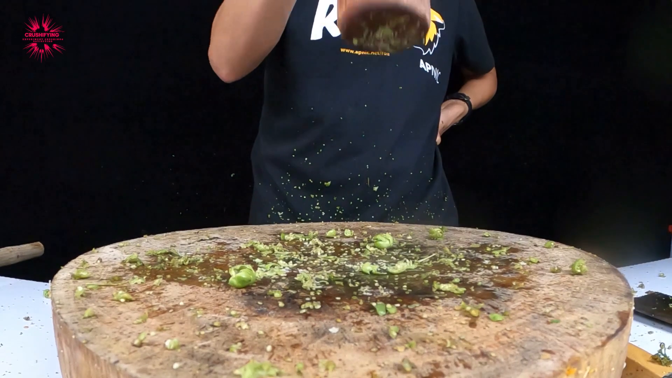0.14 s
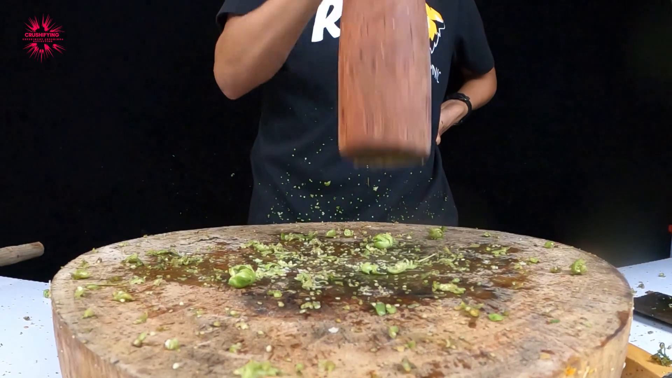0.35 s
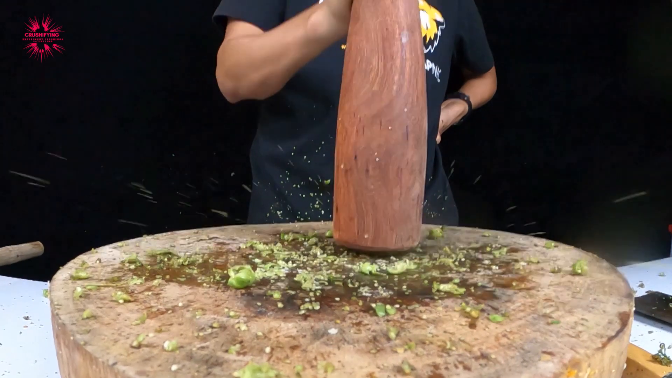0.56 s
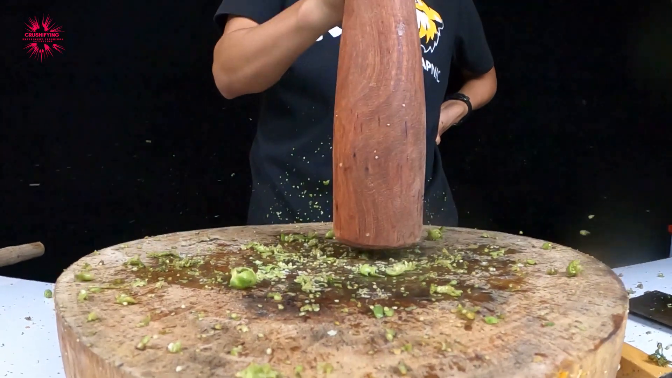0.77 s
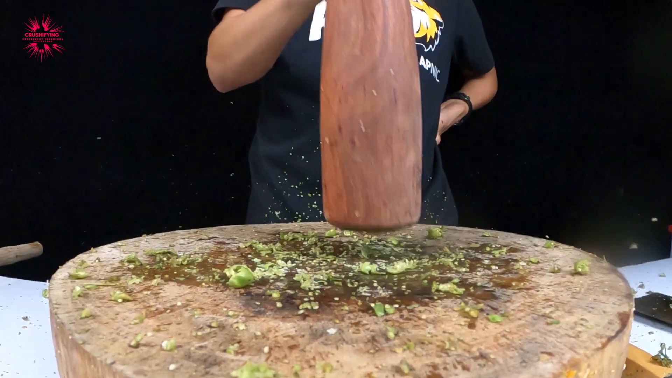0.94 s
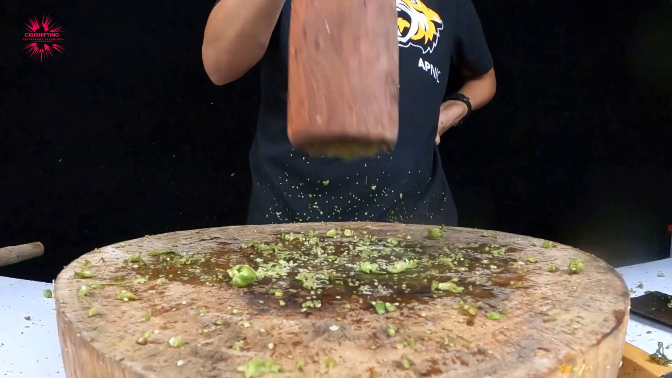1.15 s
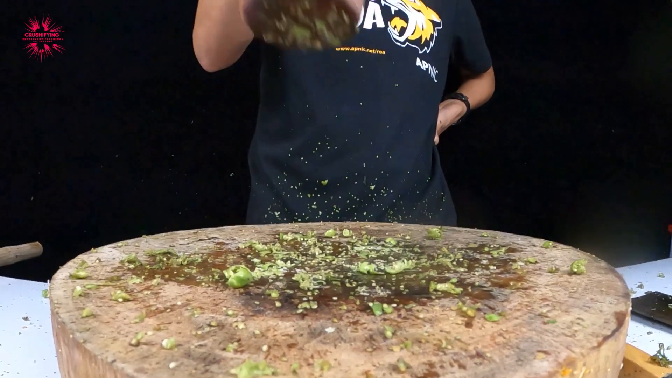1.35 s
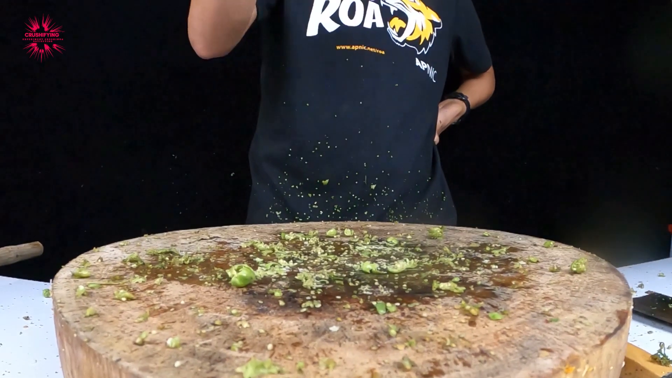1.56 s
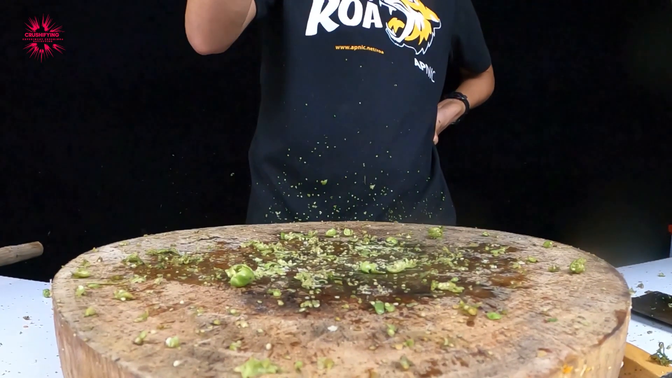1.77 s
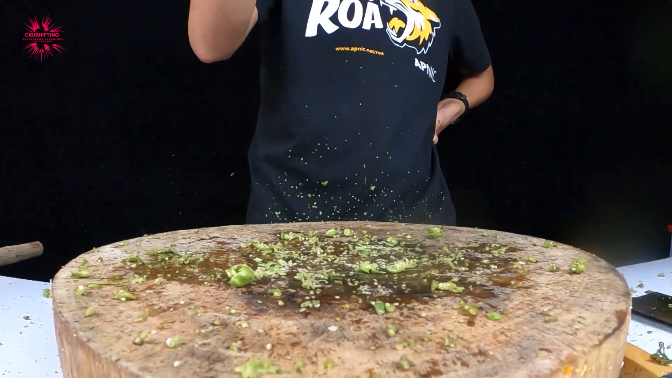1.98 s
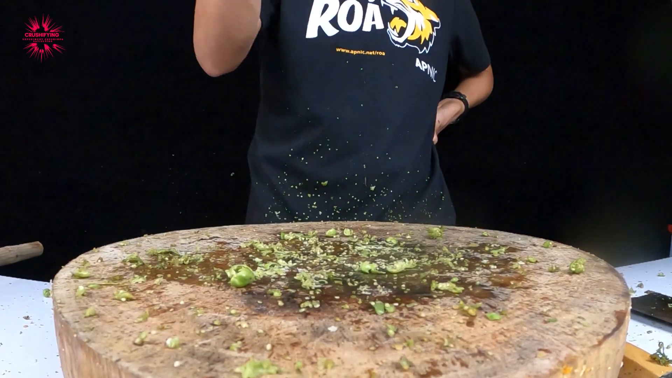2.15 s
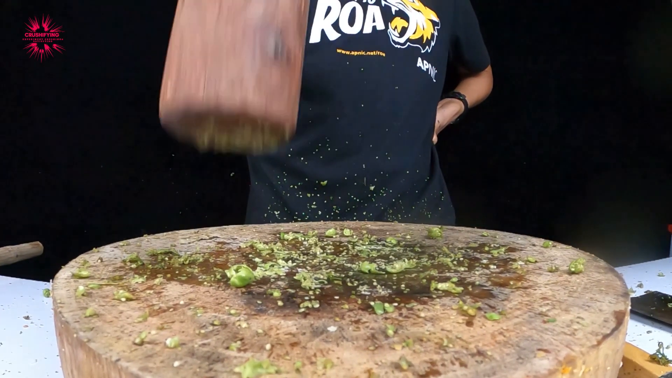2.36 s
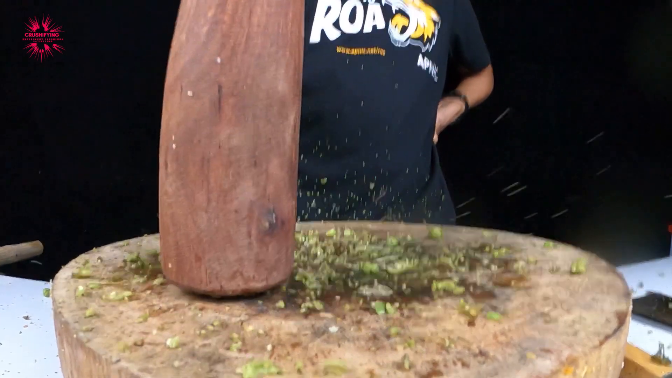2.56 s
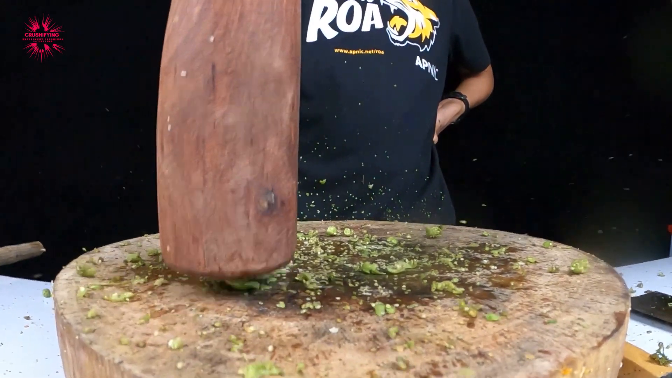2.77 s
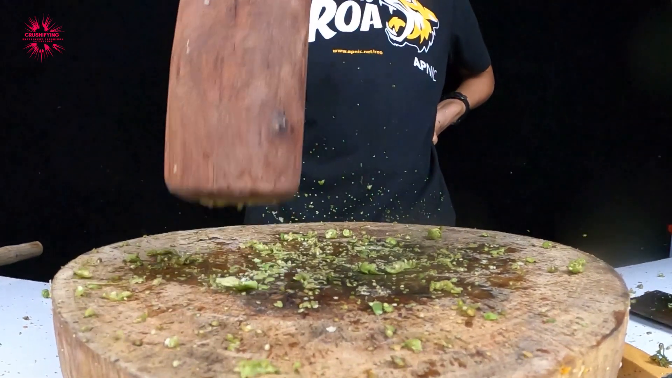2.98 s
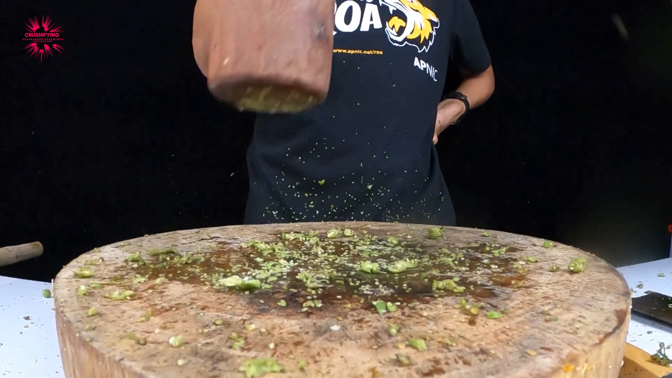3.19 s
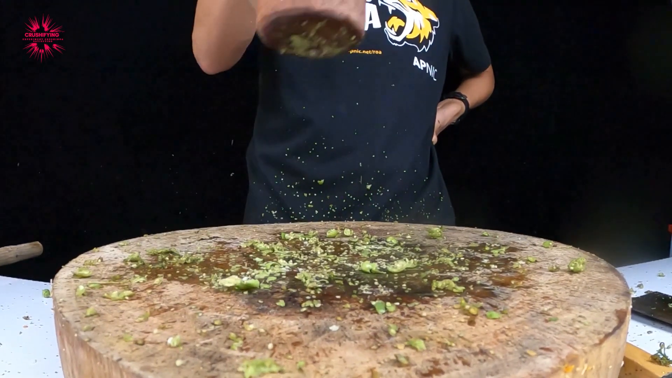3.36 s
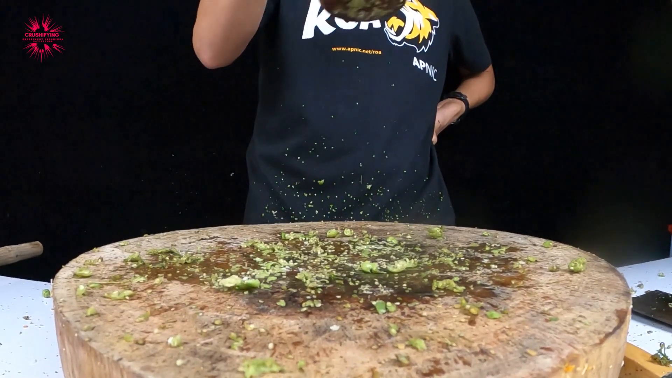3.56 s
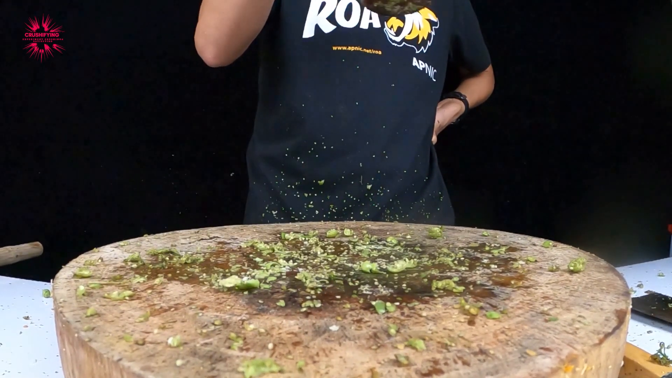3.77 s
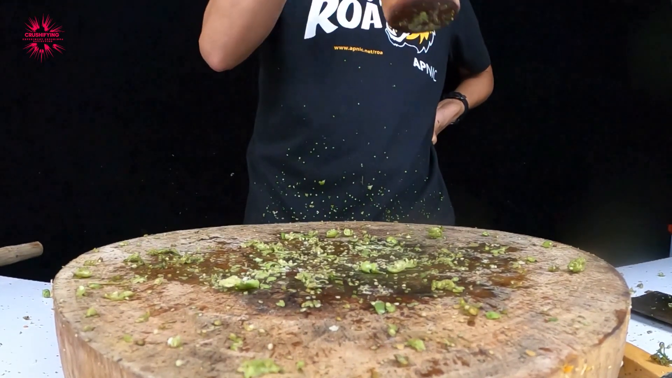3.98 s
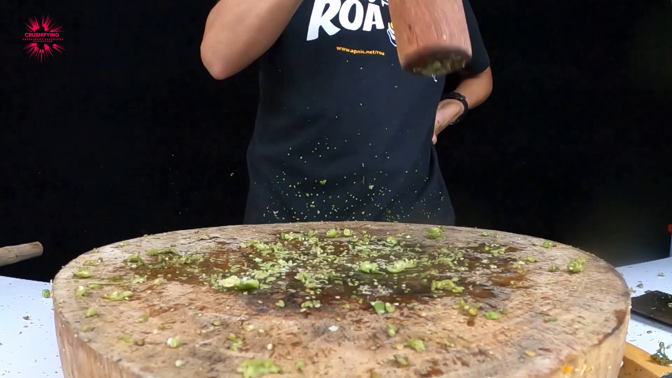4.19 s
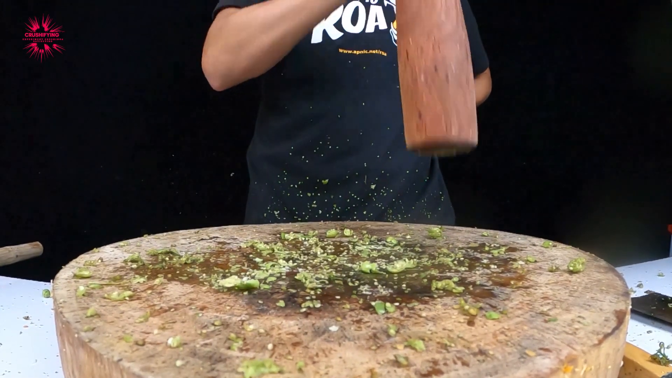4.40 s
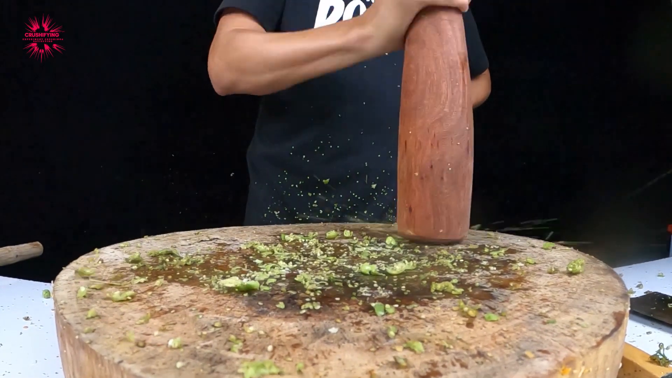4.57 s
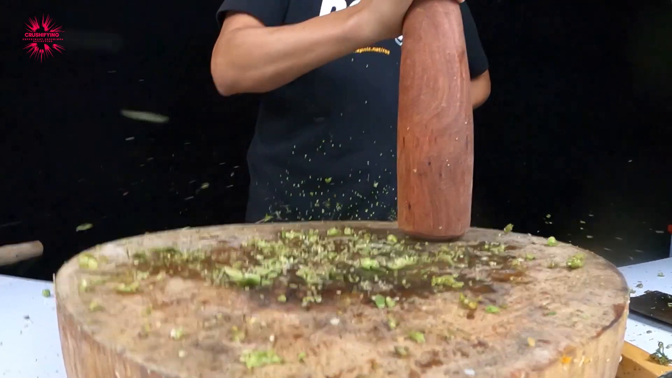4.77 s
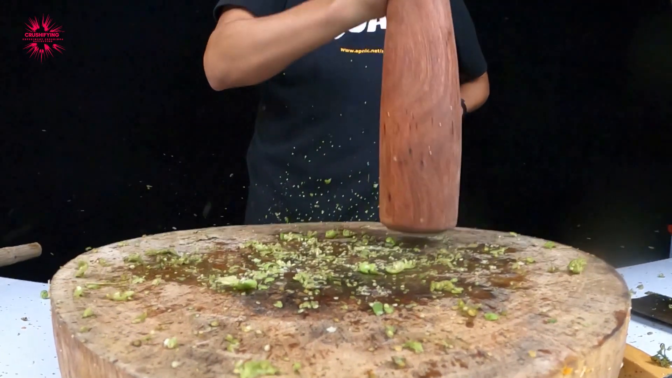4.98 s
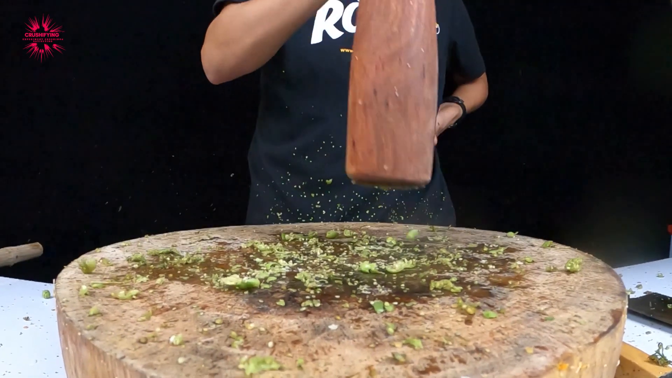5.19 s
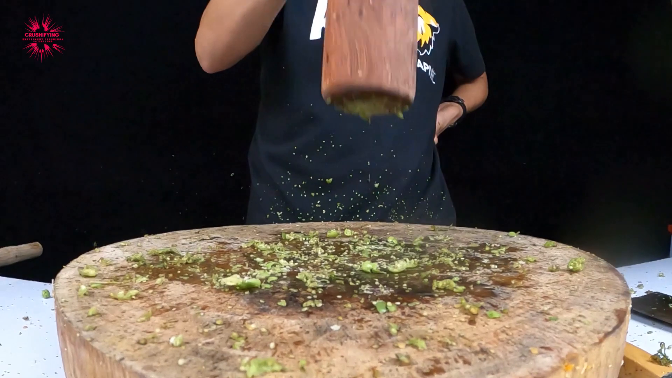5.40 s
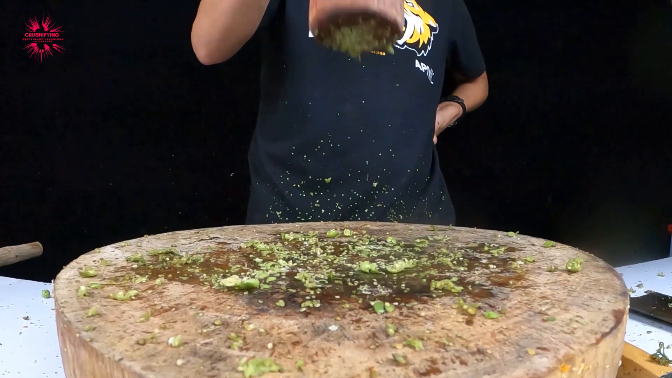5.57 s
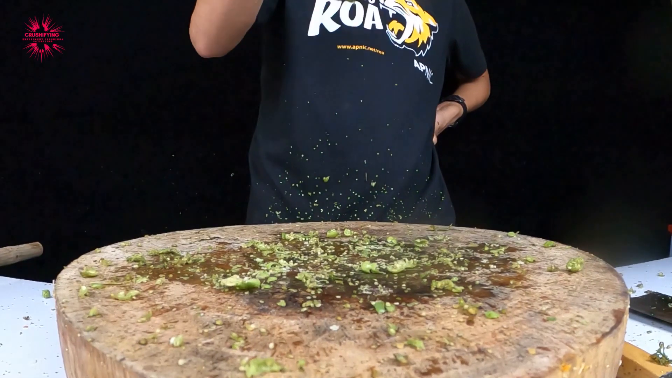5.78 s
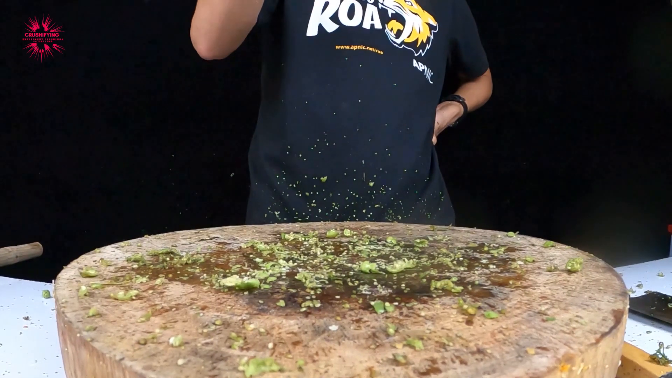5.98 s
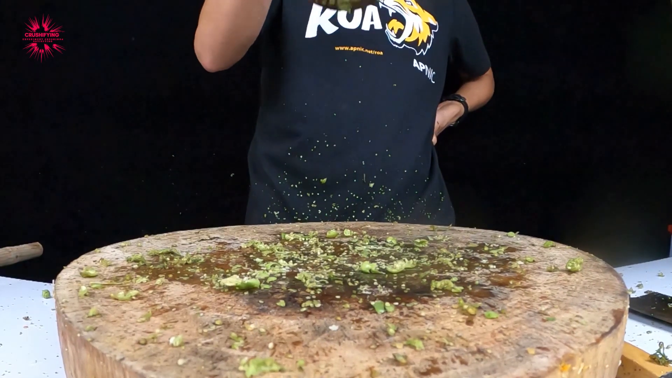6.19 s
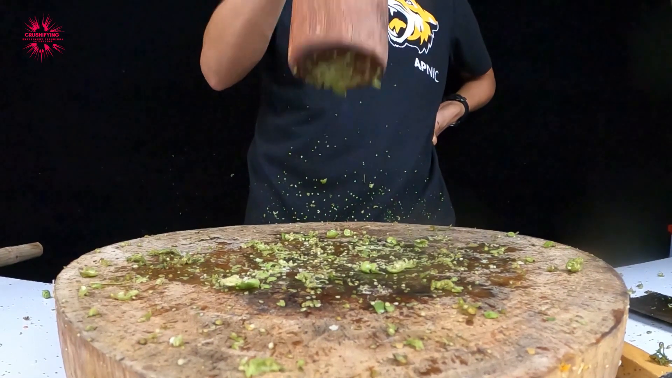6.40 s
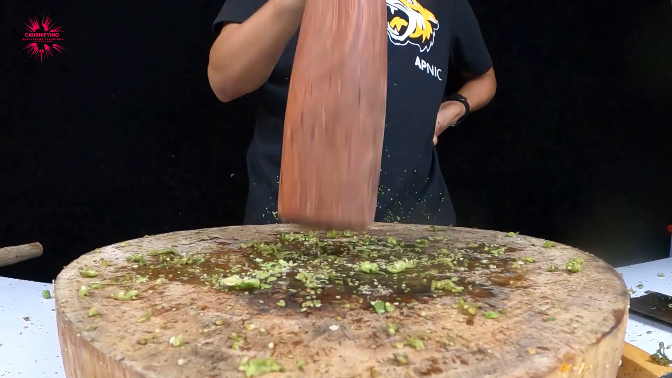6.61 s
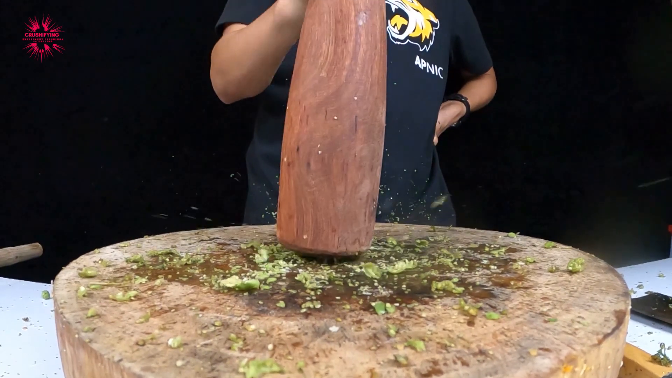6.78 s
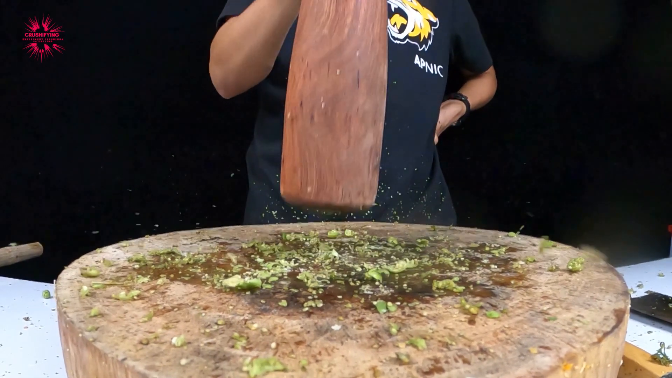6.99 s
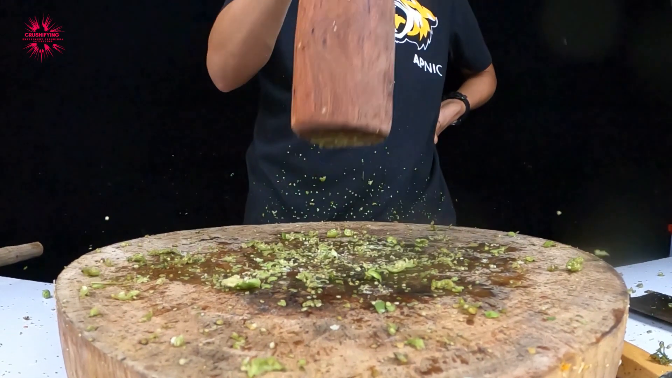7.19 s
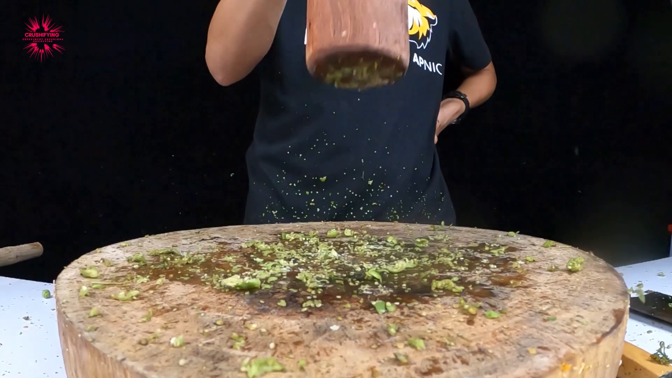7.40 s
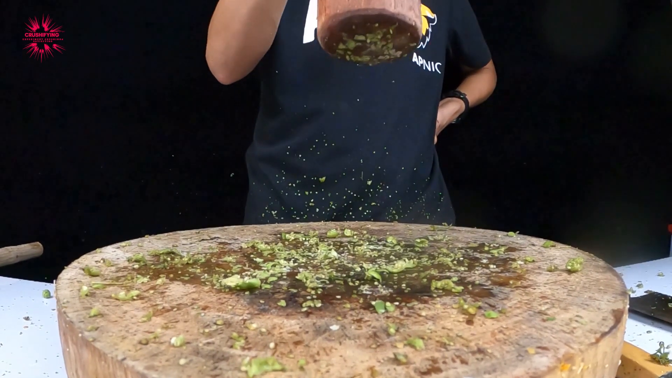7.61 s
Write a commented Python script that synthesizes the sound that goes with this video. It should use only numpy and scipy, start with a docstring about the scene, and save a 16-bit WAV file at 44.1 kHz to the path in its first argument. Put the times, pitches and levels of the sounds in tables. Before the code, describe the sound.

The dying rumble of an earlier strike opens, then four slowed, pitched-down club blows land on a wooden block about two seconds apart. Each cracks and thumps deeply, spatters soft pulp to the right and leaves a hollow, surging roar in the room. A tiny silence precedes the second hit; the last knocks the most woodenly and has a duller tail. The close microphone sounds muffled, slightly resonant and clipped at the loudest peaks.

```python
"""A reverberant room with a thick chopping block, on which a heavy wooden club crushes small fruits.
All is heard in slow motion, pitched down and drawn out: noise bursts make each crack, decaying sines ring the block.
Pulp splats and crumbs are short noise bursts on a low push; decaying bands of noise make the long rumbling tail.
The tail of an earlier blow opens the scene, with faint ticks in the quiet; four blows follow.
Peaks beyond full scale are clipped flat, and the sound drops out briefly before the second blow."""
import sys
import numpy as np
from scipy import signal
from scipy.io import wavfile
from scipy.ndimage import uniform_filter1d

SR = 44100
rng = np.random.default_rng(int(sys.argv[2]) if len(sys.argv) > 2 else 0)


def materialize(psi):
    """Save the field psi as 16-bit PCM at rate SR to the path in sys.argv[1].

    A 1-D psi becomes a single channel; in a 2-D psi each row is a channel.
    """
    bounded = np.clip(np.atleast_2d(psi).T, -1, 1)
    quanta = np.round(bounded * 32767).astype(np.int16)
    wavfile.write(sys.argv[1], SR, quanta)


N = 337365


def from_db(db):
    """Logarithmic level: the amplitude gain of a dB value."""
    return 10 ** (np.asarray(db) / 20)


def at_hz(points, hz):
    """Logarithmic pitch: interpolate a table on a log-frequency axis."""
    points_hz, values = np.array(points).T
    return np.interp(np.log(hz), np.log(points_hz), values)


def band(x, low_hz, high_hz, rate=SR):
    """Band-pass filtering with a maximally flat Butterworth response."""
    sections = signal.butter(2, [low_hz, high_hz], "band", fs=rate, output="sos")
    return signal.sosfilt(sections, x)


def resonance(x, hz, width_hz, rate=SR):
    """Simple resonance: a pair of poles gives gain 1 at the top and a width set by the damping."""
    radius = np.exp(-np.pi * width_hz / rate)
    top_gain = (1 - radius ** 2) / 2
    poles = [1, -2 * radius * np.cos(2 * np.pi * hz / rate), radius ** 2]
    return signal.lfilter([top_gain, 0, -top_gain], poles, x)


def sides(pan_db):
    """Interaural level difference: left and right gains, positive to the left."""
    return from_db([[pan_db / 2], [-pan_db / 2]])


def add(out, sound, s):
    """Superposition: mix a short stereo sound in at a time in seconds."""
    i = int(round(s * SR))
    out[:, i:i + sound.shape[1]] += sound[:, :N - i]


# What each blow leaves in the room, the first one struck before the start:
# (time [s], block ring [dB], bass [dB], low middle [dB], middle [dB], treble [dB],
# strength of sag and late swell [0-2]); the four band levels add to the room spectrum.
BLOW_TAILS = [(-1.4, -36, 4, 0, 2, 1.5, 1.0), (.655, -40, 0, -1, 0, 1, 1.1),
              (2.662, -43, 4.5, 3, 5, 5.5, 1.0), (4.727, -45, 2, 0, 1, 2.5, .8),
              (6.843, -33.5, -3, -1.5, -6, -5, .4)]
# Diffuse sound on top of the decay: it builds up, sags, then swells late.
# The dB values are scaled by the band's swell factor, sag and late swell by the blow's strength too.
BUILD_DB, BUILD_S = -8, .015
SAG_DB, SAG_AT_S, SAG_WIDTH_S = -5, .16, .12
SWELL_DB, SWELL_AT_S, SWELL_WIDTH_S = 2.5, .45, .18


def room_power(t, levels_db, t60, swell):
    """Exponential decay of a diffuse field: the powers left by all blows add up."""
    power = 0
    for (s, *_, late), level_db in zip(BLOW_TAILS, levels_db):
        after = np.maximum(t - s, 0)
        build_db = BUILD_DB * np.exp(-after / BUILD_S)
        sag_db = SAG_DB * np.exp(-((after - SAG_AT_S) / SAG_WIDTH_S) ** 2)
        swell_db = SWELL_DB * np.exp(-((after - SWELL_AT_S) / SWELL_WIDTH_S) ** 2)
        shape_db = build_db + late * (sag_db + swell_db)
        decay_db = -60 * after / t60
        power = power + (t > s) * from_db(level_db + swell * shape_db + decay_db) ** 2
    return power


# Centres of a blow's bass, low middle, middle and treble levels: (frequency [Hz])
TAIL_HZ = (70, 390, 1100, 2500)
# Spectrum that a blow excites in the room: (frequency [Hz], level [dB per Hz])
ROOM_SPECTRUM = [(10, -8), (15, -1), (38, 0), (55, -7), (90, -4), (142, -10), (300, -16), (450, -19),
                 (800, -26), (1800, -27), (2400, -30), (3000, -35.5), (4000, -44), (5200, -47)]
# Reverberation time: (frequency [Hz], t60 [s])
ROOM_T60 = [(12, 2.2), (50, 4), (140, 3.6), (370, 2.8), (970, 2.4), (2500, 2.2), (3500, 1.6), (5000, 1.15)]
# Steady background of the room: (frequency [Hz], level [dB per Hz])
QUIET_SPECTRUM = [(12, -10), (40, 0), (100, -2), (400, -18), (1000, -32), (2300, -36), (3000, -44),
                  (5000, -52)]
# Correlation of the two channels: (frequency [Hz], left-right likeness [-1 to 1])
LIKENESS = [(60, 0.99), (110, 0.99), (200, 0.94), (380, 0.77), (700, 0.48), (1290, 0.12), (2390, -0.08),
            (4420, -0.02)]
ROOM_DB, QUIET_DB = -8, -42   # added to the two spectra
RING_HZ, RING_WIDTH_HZ, RING_T60_S = 388, 76, 3.1   # width of one resonance; two in series narrow it


def echo_surge(slow, surge_db):
    """Interference of small echoes too dense to tell apart: the young tail surges at random, in dB."""
    surge = signal.lfilter([1], [1, -1.74, .7569], rng.standard_normal(len(slow)))
    young = sum((slow > s) * np.exp(-np.abs(slow - s) / .6) for s, *_ in BLOW_TAILS)
    return surge_db * young * surge / surge.std()


def room(surge_db):
    """Frequency-dependent reverberation: third-octave bands of noise, each dying at its own rate."""
    rate, size, run_in = SR / 3, N // 3 + 1, 6000   # the dull room needs a third of the samples
    out, edges = 0, 11 * 2 ** np.arange(0, 9.1, 1 / 3)
    white = rng.standard_normal((3, 2, size + run_in))   # neighbouring bands get unrelated noise
    every = np.arange(size) / rate
    slow = np.arange(0, size, 10) / rate   # coarse time axis for the envelopes
    surge = echo_surge(slow, surge_db)
    for k, (low, high) in enumerate(zip(edges, edges[1:])):
        mid, side = band(white[k % 2], low, high, rate)[:, run_in:]
        hz = np.sqrt(low * high)
        base_db = ROOM_DB + at_hz(ROOM_SPECTRUM, hz)
        levels_db = [base_db + at_hz(list(zip(TAIL_HZ, row[2:6])), hz) for row in BLOW_TAILS]
        swell = np.interp(hz, [60, 200, 4000], [.3, .9, 1.7])
        power = room_power(slow, levels_db, at_hz(ROOM_T60, hz), swell)
        power = power * from_db(surge * min(hz / 300, 1)) ** 2   # the bass surges less
        power = power + from_db(QUIET_DB + at_hz(QUIET_SPECTRUM, hz)) ** 2
        alike = np.clip(at_hz(LIKENESS, hz), -1, 1)
        pair = np.sqrt(1 + alike) * mid + np.sqrt(1 - alike) * side * [[1], [-1]]
        out = out + np.interp(every, slow, np.sqrt(power)) * pair
    # the block's main note lingers in the room as a hollow band
    once = resonance(white[2], RING_HZ, RING_WIDTH_HZ, rate)
    mid, side = resonance(once, RING_HZ, RING_WIDTH_HZ, rate)[:, run_in:]
    hollow = (mid + .35 * side * [[1], [-1]]) / mid.std()
    ring_power = room_power(slow, [row[1] for row in BLOW_TAILS], RING_T60_S, swell=.4)
    out = out + hollow * np.interp(every, slow, np.sqrt(ring_power))
    return signal.resample_poly(out, 3, 1, axis=1)[:, :N] * sides(-.6)


BURST = 3072   # samples in one short sound


def crack(rise_s, t60, body_db, top_db, apart):
    """Impulsive broadband noise: a bright band of peak about 1, a body below, a thin top above."""
    t = np.arange(BURST) / SR
    shared, left, right = rng.standard_normal((3, BURST))
    late = np.roll(shared, 6)   # the left port hears it later
    noise = np.array([late + apart * left, shared + apart * right])
    rise = np.minimum(t / rise_s, 1) ** 2
    noise *= rise * from_db(-60 * np.maximum(t - rise_s, 0) / t60)
    bright = band(band(noise, 2250, 3150), 2100, 3400)
    body = band(band(noise, 500, 2000), 850, 2300)
    top = band(noise, 2900, 4700)
    sound = bright + from_db(body_db) * body + from_db(top_db) * top
    peak_power = np.max(uniform_filter1d(np.mean(bright ** 2, axis=0), size=90))
    return sound / np.sqrt(peak_power * 2)


def sharp_sounds(rows, t60, pan_db, spread_db, top_db, push_db):
    """Transient excitation: short cracks, each riding on a low push that starts downwards."""
    out, t = np.zeros((2, N)), np.arange(BURST) / SR
    push = -from_db(push_db) * t / .003 * np.exp(1 - t / .003) * (1 - t / .009)
    for s, peak_db, body_db in rows:
        burst = crack(.002, t60, body_db, top_db, apart=.6)
        pan = sides(pan_db + spread_db * rng.standard_normal())
        add(out, from_db(peak_db) * (pan * burst + push), s - .002)
    return out


# Faint ticks in the quiet: (time [s], peak of the bright band [dB])
TICKS = [(0.0872, -62.5), (0.3172, -60.5), (0.5347, -63.5), (1.7315, -60), (1.9690, -64), (2.0690, -69),
         (2.3755, -65.5), (3.9070, -63), (4.2073, -63.5), (4.6433, -62.5), (6.2322, -63.5), (6.4572, -64.5),
         (6.6817, -64.5)]


def ticks():
    """Transient excitation at faint level: short bright bursts, mostly from the right."""
    rows = [(s, peak_db, -7) for s, peak_db in TICKS]   # body [dB]
    return sharp_sounds(rows, t60=.04, pan_db=-7.5, spread_db=1.5, top_db=-22, push_db=-20)


# Modes of the block and its stand: (frequency [Hz], t60 [s], left minus right [dB])
BLOCK_MODES = [(28, .25, -.5), (70, .1, -.5), (142, .1, -1), (205, .12, -2), (280, .07, -3),
               (376, .078, -4), (480, .05, -3), (560, .06, -3), (690, .06, -4)]
# Blows: (crack peak time [s], crack rise [s], crack level [dB], crack t60 [s],
# crack left minus right [dB], crack top [dB], delay of the wood contact [s],
# then one level [dB] for each mode of the block)
BLOWS = [(.6545, .010, -22, .035, -7, -3, .0016, -13, -26, -30, -28, -30, -9, -27, -33, -32),
         (2.6640, .009, -13.5, .02, -9, -9, -.0008, -10.5, -21, -20, -19, -17, -9, -12, -14, -18),
         (4.7256, .010, -21.5, .035, -7, -7, .0034, -17, -24, -32, -15.5, -22, -14, -22, -30, -16),
         (6.8420, .004, -16.5, .016, -9, -19, 0.0003, -11, -21, -22, -24, -22, -1.5, -32, -34, -25)]


def blows():
    """Modal excitation by impact: the fruit bursts, wood meets wood, every mode starts downwards."""
    out, t = np.zeros((2, N)), np.arange(SR // 2) / SR
    cushion = 1 - np.exp(-t / .0016)   # the pulp cushions the contact
    for s, rise_s, crack_db, crack_t60, pan_db, top_db, delay_s, *mode_db in BLOWS:
        burst = crack(rise_s, crack_t60, body_db=-9, top_db=top_db, apart=.4)
        add(out, from_db(crack_db) * sides(pan_db) * burst, s - rise_s)
        for (hz, t60, mode_pan_db), level_db in zip(BLOCK_MODES, mode_db):
            ring = -np.sin(2 * np.pi * hz * t) * from_db(level_db - 60 * t / t60) * cushion
            lean_s = .022 / np.sqrt(hz)   # slow modes lean in earlier
            add(out, ring * sides(mode_pan_db), s + delay_s - lean_s)
    return out


# Clearest splats of scattered pulp: (time [s], peak of the bright band [dB], body below it [dB])
SPLATS = [(0.6809, -28.5, -8), (0.7198, -32.5, 4), (0.7414, -36.5, -4), (0.8664, -38.5, 1),
          (0.9178, -37.5, 3), (0.9687, -34.5, -6), (1.0094, -41, 7), (1.0904, -34, -3), (1.4564, -50.5, 3),
          (1.7928, -60, 2), (2.6985, -25.5, -5), (2.7322, -25, 3), (2.829, -36.5, 1), (2.8970, -36, 0),
          (2.9292, -31, -7), (2.9841, -30, 5), (3.0014, -34.5, -1), (3.0834, -28.5, 1), (3.0919, -35, 0),
          (3.1587, -39, -4), (3.4214, -46, 4), (4.7444, -34.5, 5), (4.778, -35, 0), (4.7955, -32.5, 4),
          (4.8304, -30, -6), (4.9417, -34, -2), (4.9901, -33.5, -2), (5.0400, -35, -4), (5.1218, -41.5, 3),
          (5.6905, -50, 7), (6.9002, -37.5, 3), (6.9132, -32, -10), (6.9845, -35, -2), (7.0703, -38.5, 5),
          (7.2399, -47.5, -1)]


def splats():
    """Transient excitation by scattered pulp: splats and crumbs, mostly from the right."""
    rows = SPLATS + crumb_rows()
    return sharp_sounds(rows, t60=.032, pan_db=-6.5, spread_db=2.5, top_db=-20, push_db=6)


CRUMB_COUNT, CRUMB_FROM_S, CRUMB_TO_S = 10, .05, .55   # count per blow, times after it
CRUMB_DB, CRUMB_FADE_DB_PER_S, CRUMB_SPREAD_DB = -40.5, 20, 2.5   # level before treble and fade


def crumb_rows():
    """Random scattering: crumbs patter after each blow, fading, and follow its treble in the room."""
    rows = []
    for s, *_, treble_db, late in BLOW_TAILS[1:]:
        when, size = rng.random((2, CRUMB_COUNT))
        after_s = CRUMB_FROM_S + (CRUMB_TO_S - CRUMB_FROM_S) * when
        level_db = CRUMB_DB + treble_db - CRUMB_FADE_DB_PER_S * after_s
        level_db += CRUMB_SPREAD_DB * (2 * size - 1)
        rows += [(s + a, db, 1.5) for a, db in zip(after_s, level_db)]   # body [dB]
    return rows


def scene():
    """Superposition of the room, ticks, blows and splats."""
    return room(surge_db=3.3) + ticks() + blows() + splats()


# The brief silence: (start [s], end [s])
DROPOUT = (2.578, 2.645)
MIC_HZ, MIC_WIDTH_HZ, MIC_DB = 2390, 260, 8.5   # the microphone's own resonance, slowed down
SLOWED_TOP_HZ, HISS_TOP_HZ, CUTOFF_HZ = 5500, 7000, 16000
HISS_DB = -80   # level before its low-pass


def low_pass(x, order, stop_db, hz):
    """Steep low-pass filtering: a Chebyshev response whose stop band starts at hz."""
    return signal.sosfilt(signal.cheby2(order, stop_db, hz, fs=SR, output="sos"), x)


def record(dry):
    """Resonant, band-limited pick-up with overload: hiss, a short dropout and peaks clipped flat."""
    heard = dry + from_db(MIC_DB) * resonance(dry, MIC_HZ, MIC_WIDTH_HZ)
    slowed = low_pass(heard, 16, 60, SLOWED_TOP_HZ)   # slowing down lowers the top
    hiss = low_pass(rng.standard_normal((2, N)), 10, 40, HISS_TOP_HZ)
    start, end = DROPOUT
    passing = np.interp(np.arange(N) / SR, [start - .004, start, end, end + .004], [1, 0, 0, 1])
    clipped = np.clip((slowed + from_db(HISS_DB) * hiss) * passing, -1, 1)
    cut = low_pass(clipped, 12, 70, CUTOFF_HZ)
    noise_floor = from_db(-99) * rng.standard_normal((2, N))
    return np.clip(cut, -1, 1) + noise_floor


dry = scene()
out = record(dry)
materialize(out)
```